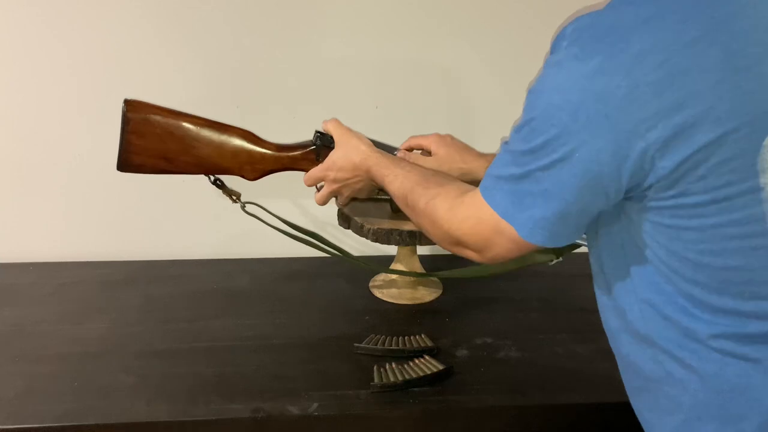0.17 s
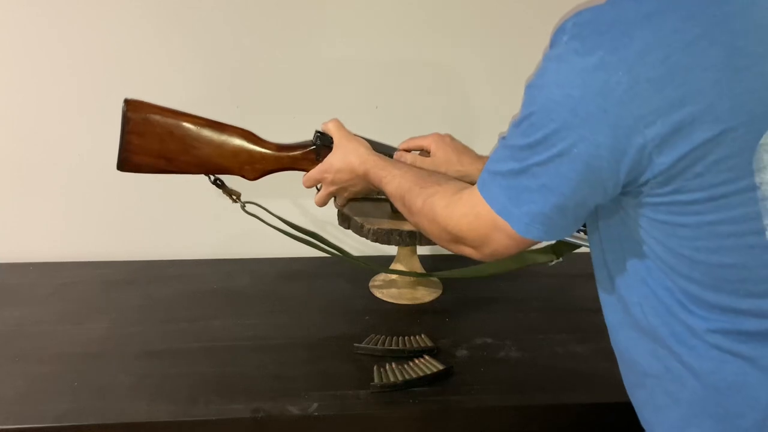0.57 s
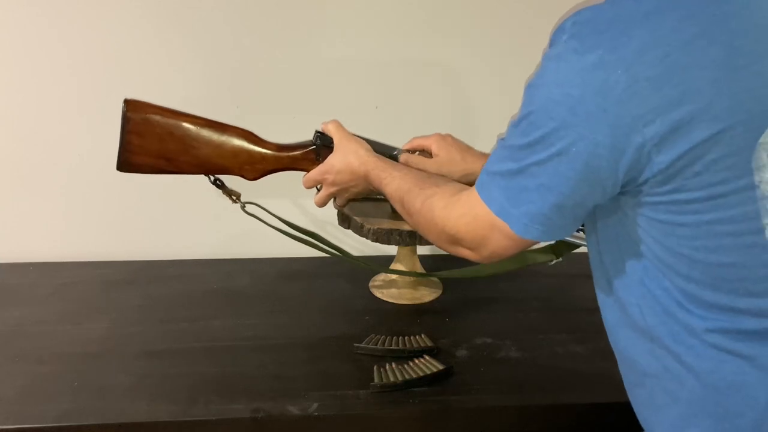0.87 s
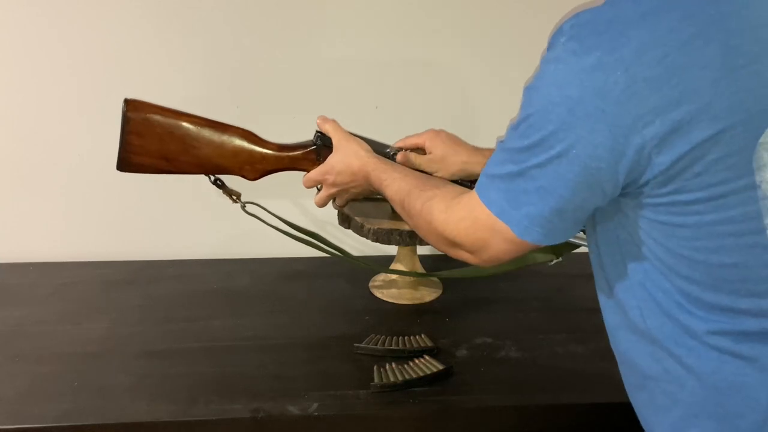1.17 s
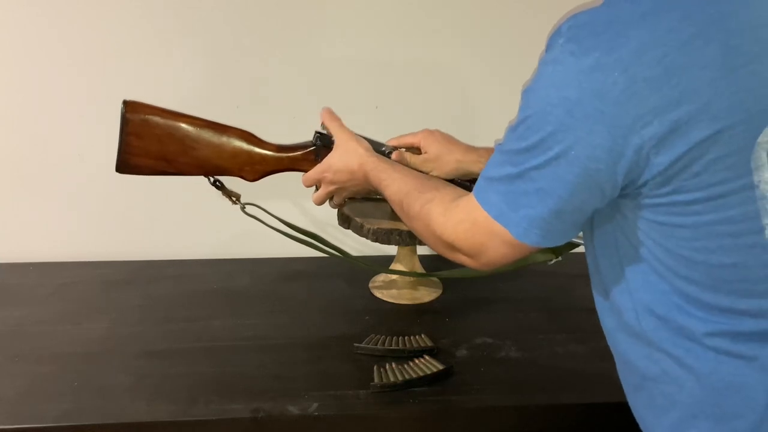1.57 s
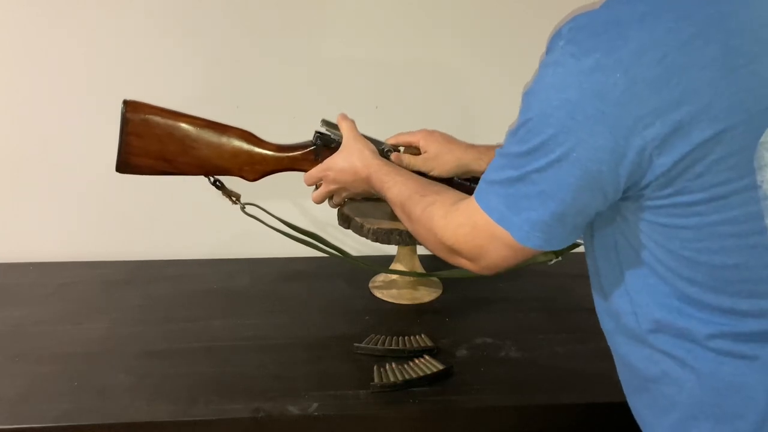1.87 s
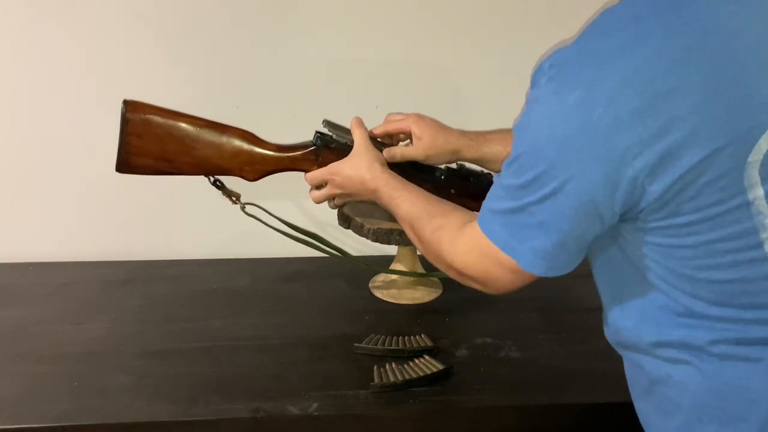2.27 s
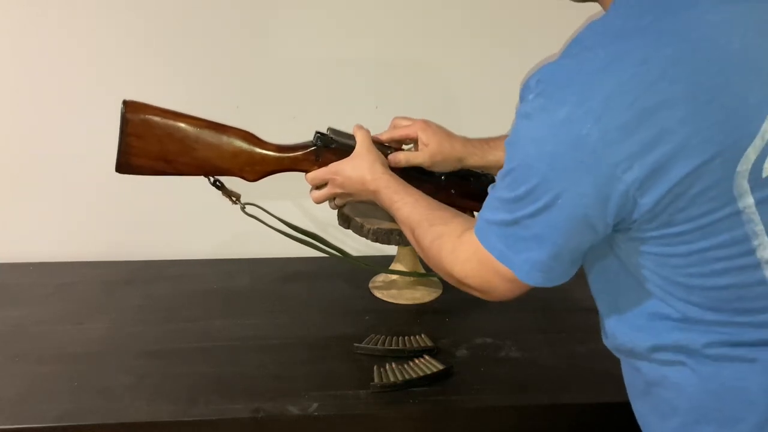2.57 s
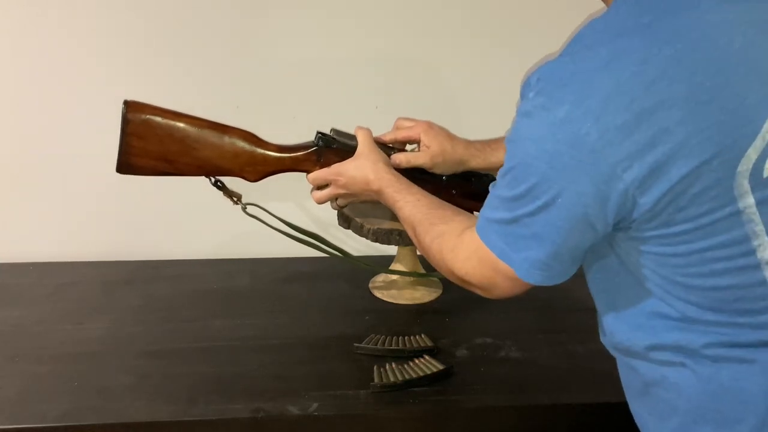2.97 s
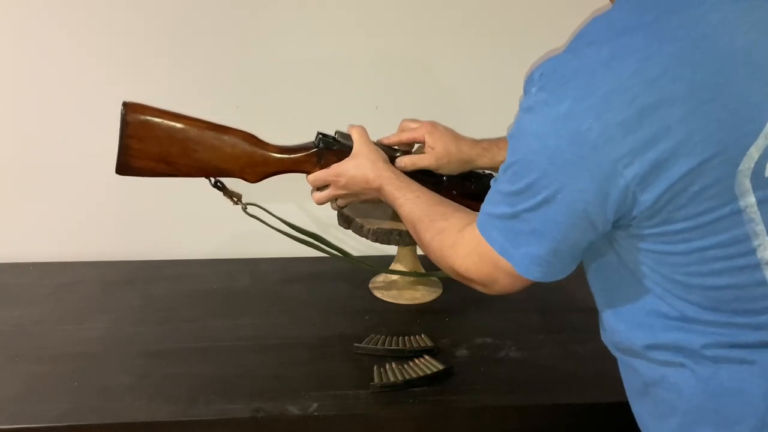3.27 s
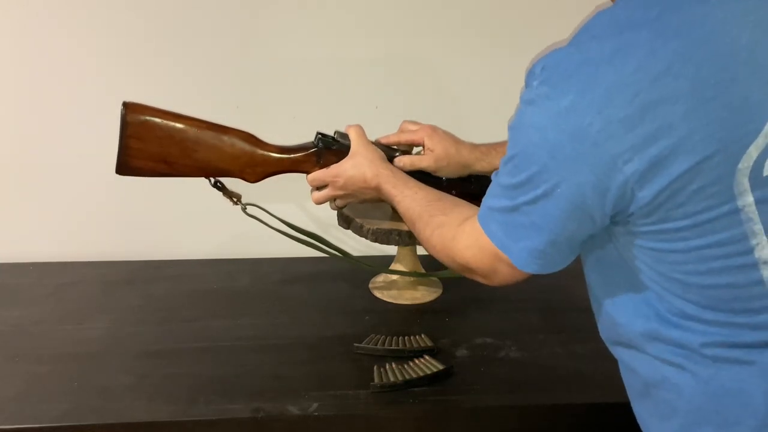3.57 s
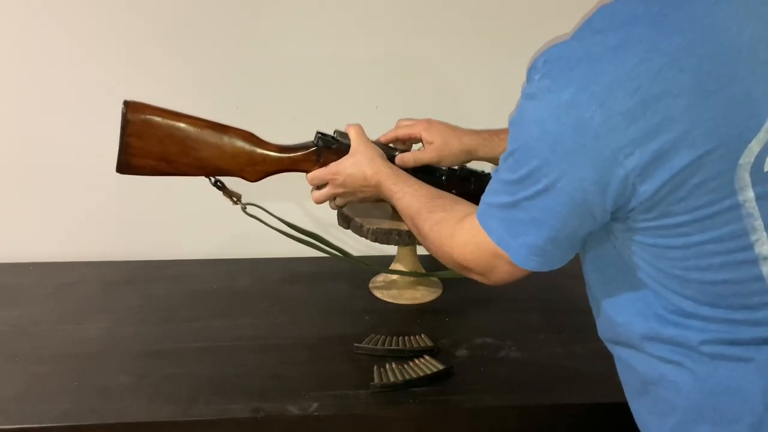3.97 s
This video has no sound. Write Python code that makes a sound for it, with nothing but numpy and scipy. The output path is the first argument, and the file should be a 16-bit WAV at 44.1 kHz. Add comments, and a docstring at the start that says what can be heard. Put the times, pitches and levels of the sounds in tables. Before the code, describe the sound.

Quiet handling, then sharp gritty metal clacks and a quick rattle as a rifle bolt is fitted and slid, over a low room rumble.

```python
"""Hands fit a steel rifle bolt into its receiver on a wooden stand, in a small bare room; 4.1 s, two ports.
0-0.8 s: faint thumps, clicks and scrapes over a low, lumpy rumble that runs throughout.
0.8-1.8 s: contacts crowd and harden, as chattering grit that rings damped steel modes; the loudest is at 1.58 s.
2.2-2.5 s: a quick run of contacts with thumps, which are jolts that ring the stand's modes.
2.7-4.1 s: sparse contacts and scrapes of dense grit; noise tails make the room answer every sound."""
import sys
import numpy as np
from scipy import signal
from scipy.fft import rfft, irfft, next_fast_len
from scipy.io import wavfile
from scipy.ndimage import uniform_filter1d

SR = 44100
rng = np.random.default_rng(int(sys.argv[2]) if len(sys.argv) > 2 else 0)


def to_wav(sig):
    """Store sig (one row per channel, or 1-D mono) as 16-bit WAV at the path in sys.argv[1].

    Samples outside -1..1 are clipped; the rate is SR.
    """
    pcm = np.clip(np.atleast_2d(sig), -1, 1) * 32767
    pcm = np.round(pcm).astype(np.int16)
    wavfile.write(sys.argv[1], SR, pcm.T)  # frames by channels


N = 181251  # samples


def gain_of(db):
    """Amplitude factor of a level in dB."""
    return 10 ** (np.asarray(db) / 20)


def evened(x):
    """Scales to an rms of 1."""
    return x / np.sqrt(np.mean(x ** 2) + 1e-20)


def read(points, hz):
    """Interpolates (Hz, value) points over log frequency."""
    point_hz, value = np.transpose(points)
    return np.interp(np.log(hz + 1), np.log(point_hz + 1), value)


def add(mix, start_s, sound):
    """Adds a sound into the mix, cut at the end."""
    part = mix[round(start_s * SR):][:len(sound)]
    part += sound[:len(part)]


def colour(x, points):
    """Filters by a (Hz, dB) outline with causal, minimum phase."""
    hz = abs(np.fft.fftfreq(4096, 1 / SR))
    log_gain = np.log(gain_of(read(points, hz)))
    spectrum = np.exp(np.conj(signal.hilbert(log_gain)))
    taps = np.fft.ifft(spectrum).real[:1024]
    return signal.oaconvolve(x, taps)[:len(x)]


# Contacts of steel. Each row: start in seconds, peak of the 700-2500 Hz band in dB, trims in dB of the
# lows (near 500 Hz), mids (3 kHz), highs (6.5 kHz) and top (12 kHz), ring over bare impacts in dB,
# favoured ring pitch in Hz.
KNOCKS = [(0.274, -56.5, -6.5, -8, -30, -20, 0, 1170), (0.298, -48, -12, -12, -47, -34, -6, 940),
          (0.789, -44, -11.5, 6.5, 11, -0.5, -4.5, 4170), (0.941, -50.5, -10, -1, -9, -57, 16, 866),
          (1.002, -31.5, -17, 2.5, -1.5, -20, 0, 3080), (1.133, -30.5, -21.5, -11.5, -25, -40.5, -8, 2990),
          (1.262, -27.5, -16, -14.5, -37, -46, -16, 2000), (1.448, -53, -16, -20, -26, -36.5, 8, 972),
          (1.508, -31.5, -5, 22.5, 11, -5, -11, 1910), (1.513, -27, -36, -6.5, -7, -23, -5.5, 2990),
          (1.548, -22.5, -14.5, -5.5, -20, -26.5, -13.5, 1040), (1.571, -29.5, -26, -22, -7, -34, 0, 1046),
          (1.581, -18, -52.5, 5, -5.5, -5.5, 0.5, 1320), (1.634, -20.5, -18, -4, -19, -27.5, -9, 2210),
          (1.803, -27.5, -14, -8, -26, -37, -12, 1194), (2.188, -22, -26, -10.5, -24.5, -30, -9, 1390),
          (2.199, -24.5, -23, -12.5, -24, -30, 3, 2030), (2.211, -30.5, -9.5, -1.5, -7, -23.5, -2.5, 2990),
          (2.225, -29, -21.5, -13, -26.5, -29, -10, 1390), (2.258, -28, -21, -15, -24.5, -40, -20, 2040),
          (2.378, -35.5, -19.5, -7.5, -24.5, -32.5, -8, 2990), (2.423, -40, -6.5, -10, -16, -23, 5.5, 1937),
          (2.448, -41.5, -20.5, 0.5, -5.5, -3.5, 0, 1210), (2.736, -67.5, -6.5, -17, -22.5, -7.5, 5.5, 964),
          (2.884, -67.5, -9.5, -3, 0.5, 5, -7.5, 1307), (2.98, -35, 0.5, 7, -0.5, -3.5, -5.5, 5260),
          (2.985, -29.5, -11.5, -29.5, -21, -32, -6, 1240), (3.299, -61.5, -9, -27, -29.5, -25.5, 5.5, 987),
          (3.811, -38.5, -20, -13.5, -48, -39, -7.5, 1050)]
CHATTER_S, BUILD_S = .0075, .003  # span of a -30 dB contact, linear onset
LONGER_PER_DB = 0.0362  # share by which the span grows per dB over -30


def knock(start_s, peak_db, low_db, mid_db, high_db, top_db, ring_db, favour_hz):
    """Milliseconds of steel chatter that build quickly and stop as the parts seat; harder lasts longer."""
    t = np.arange(7000) / SR
    chatter_s = CHATTER_S * max(1 + LONGER_PER_DB * (peak_db + 30), .4)
    seating = np.exp(-(t / chatter_s) ** 4)
    rattle = .2 * np.exp(-t / 0.033)  # loose parts rattle on faintly
    span = (seating + rattle) * np.minimum(t / BUILD_S, 1)
    outline = [(200, low_db - 14.0), (450, low_db + 10.0), (720, low_db), (920, -1.5),
               (1400, 0.0022), (2200, .15 * mid_db), (3000, mid_db), (4500, mid_db - 3.5),
               (6500, high_db + 3.5), (8500, top_db + 3), (11500, top_db + 6), (16000, top_db - 16.5)]
    sound = colour(steel(chatter_of(span), ring_db, favour_hz), outline)
    level_band = signal.butter(2, [700, 2500], "band", fs=SR, output="sos")
    body = signal.sosfilt(level_band, sound)
    return start_s, gain_of(peak_db) * sound / abs(body).max()


def chatter_of(span):
    """Many small impacts inside the span partly even out, so that no chance pitch stands far out."""
    spectrum = rfft(grit(len(span), 14000, 2.2) * span)
    drive = irfft(spectrum / np.sqrt(abs(spectrum) + 1e-9), len(span))  # halves its dB range
    local_power = uniform_filter1d(drive ** 2, size=90).clip(1e-12)
    return drive * span / np.sqrt(local_power)


def grit(size, per_s, spread_db):
    """Tiny impacts at random times, of uneven strength and random sign."""
    hit_draw, sign_draw, strength_draw = rng.random((size, 3)).T
    hits = hit_draw < per_s / SR
    strength = gain_of(-spread_db * np.log(strength_draw + 0.003))
    return hits * np.sign(sign_draw - .5) * strength


# Modes of bolt and receiver, damped by the hands.
# Each row: pitch in Hz, level before the contact point's bias in dB, t60 in seconds.
STEEL = [(850, -4, .035), (970, -2, .045), (1090, -3, .035), (1250, -2, .035), (1380, -3, .035),
         (1710, -4, .03), (1850, -4, .03), (2000, -3, .035), (2400, -6, .025), (2990, -3, .06),
         (3230, -7, .03), (3470, -7, .025), (3780, -5, .03), (3950, -4, .05), (4430, -8, .025),
         (5200, -8, .025), (5620, -8, .025), (6280, -8, .025), (6830, -8, .03), (7300, -9, .025),
         (10500, -8, .025), (11100, -6, .025), (11800, -8, .02)]


def steel(drive, ring_db, favour_hz):
    """Bare impacts plus the modes they ring, most those near the pitch that the contact point favours."""
    t = np.arange(6000) / SR
    hz, mode_db, t60_s = np.transpose(STEEL)[:, :, None]
    reach, detune = rng.standard_normal((len(STEEL), 2)).T[:, :, None]
    near_db = -np.minimum(51.0 * abs(np.log2(hz / favour_hz)), 13.0)  # 51 dB per octave, at most 13 dB
    level_db = mode_db + near_db + 0.5 * reach - 60 * t / t60_s
    modes = gain_of(level_db) * np.sin(2 * np.pi * hz * (1 + 0.009 * detune) * t)
    ring = modes.sum(0)
    ring = ring / np.linalg.norm(ring)
    return drive + gain_of(ring_db) * signal.oaconvolve(drive, ring)[:len(drive)]


# Strokes of sliding parts and hands. Each row: time of reaching top speed in seconds, rise, hold and fall
# in seconds, body level at the top in dB, treble over body in dB, low rub over body in dB, hiss pitch in Hz.
SCRAPES = [(0.166, 0.031, 0.082, 0.078, -76, -12, -10, 1940),
           (0.294, 0.028, 0.028, 0.042, -69, -23, -6.5, 1310),
           (0.535, .03, 0.067, 0.085, -72.5, -0.5, -10, 2630),
           (1.023, 0.014, 0.012, .06, -48.5, -10.5, -14, 1920),
           (1.072, 0.045, 0.053, 0.016, -55, -12.5, -18, 2030),
           (1.159, 0.022, 0.011, 0.13, -56, -30, -33.5, 1840),
           (1.289, 0.032, 0.018, 0.095, -57, -26, -5.5, 2220),
           (1.501, 0.041, 0.0065, .01, -66, -6, -1.5, 3050),
           (1.521, 0.018, 0.017, .02, -43.5, -1, -15, 2070),
           (1.601, 0.014, 0.014, 0.026, -39, -9.5, -18, 2010),
           (2.168, .008, 0.037, .02, -57, -18.5, -14, 1250),
           (2.27, 0.019, 0.026, 0.11, -54, -21, 0.5, 1710),
           (2.389, 0.014, 0.037, 0.049, -56, -14, -10, 1700),
           (2.499, 0.044, 0.032, .1, -70, -13.5, 5.5, 1230),
           (2.752, 0.028, 0.025, 0.029, -82.5, -20.5, 14.5, 908),
           (2.973, 0.099, 0.0067, 0.012, -58, -9.5, -7.5, 1990),
           (3.039, 0.041, 0.044, .12, -66.5, -12, 1.5, 1498),
           (3.311, 0.029, 0.073, 0.11, -88, -30, 19, 903),
           (3.713, 0.039, 0.092, 0.037, -77.5, -22.5, -15, 1805),
           (3.84, 0.022, 0.01, 0.11, -60.5, -25, -6, 1900)]
STROKE_END_DB = -27.5  # start and end of a stroke re its top, before the end taper


def scrape(top_s, rise_s, hold_s, fall_s, top_db, treble_db, rub_db, favour_hz):
    """Dense grit under the moving part rings the steel a little; skin on wood adds a low rub."""
    t = np.arange(-rise_s, hold_s + fall_s, 1 / SR)
    rub = steel(grit(len(t), 3500, 2.1), -12.5, favour_hz)
    body = evened(colour(rub, [(0.1 * favour_hz, -20), (0.51 * favour_hz, -5.5), (favour_hz, 0),
                               (1.5 * favour_hz, -5.5), (3.3 * favour_hz, -30)]))
    high = evened(colour(rub, [(2500, -26.5), (4000, 8.0), (7000, -4.5), (11500, -10.5), (15000, -33)]))
    low = evened(colour(rub, [(150, -17.5), (300, 6.0), (700, -9), (1100, -33.5), (3000, -58.0)]))
    mix = body + gain_of(treble_db) * high + gain_of(rub_db) * low
    away_from_top = np.maximum(-t / rise_s, np.maximum(t - hold_s, 0) / fall_s)
    level = gain_of(top_db + STROKE_END_DB * away_from_top)
    return top_s - rise_s, level * signal.windows.tukey(len(t), .1) * mix


# Pushes on the wooden stand. Each row: start in seconds, peak in dB, favoured pitch in Hz.
THUMPS = [(0.058, -58.5, 251), (0.275, -51.5, 250), (0.319, -52, 182), (0.806, -46.5, 229),
          (1.015, -41, 260), (1.126, -47.5, 250), (1.262, -49, 414), (1.513, -43, 266), (1.586, -44.5, 277),
          (1.64, -35, 252), (1.809, -49, 267), (2.194, -37.5, 267), (2.203, -35.5, 263), (2.22, -36, 294),
          (2.444, -45, 269), (2.515, -45, 264), (2.754, -57.5, 116), (2.986, -44, 398), (2.998, -44, 174),
          (3.028, -49.5, 388), (3.239, -58, 175.4), (3.81, -50.5, 256)]
# Modes of stand and table.
# Each row: pitch in Hz, level before the favoured-pitch bias in dB, t60 in seconds.
STAND = [(118.5, 6.5, 0.21), (186.4, 2.5, 0.082), (235, -2, 0.051), (262.2, -2.5, 0.12), (372.6, 0.5, 0.13),
         (450, 0, 0.028), (495, -9, 0.014)]
SWING_UP_S = .005


def thump(start_s, peak_db, favour_hz):
    """A short train of jolts rings the modes of the stand, most those near the favoured pitch."""
    t = np.arange(12000) / SR
    hz, mode_db, t60_s = np.transpose(STAND)[:, :, None]
    near_db = -26.0 * abs(np.log2(hz / favour_hz))  # 26 dB per octave
    swing = 1 - np.exp(-t / SWING_UP_S)  # the heavy stand takes time to swing up
    modes = gain_of(mode_db + near_db - 60 * t / t60_s) * np.sin(2 * np.pi * hz * t)
    jolts = 0.21 * grit(len(t), 120, 1.5) * np.exp(-t / 0.015)
    jolts[0] = 1
    sound = signal.oaconvolve(jolts, modes.sum(0) * swing)[:len(t)]
    return start_s, gain_of(peak_db) * sound / abs(sound).max()


# Decay of the room. Each row: frequency in Hz, t60 in seconds.
ROOM = [(200, 0.77), (600, .36), (1400, 0.39), (3700, 0.38), (7000, 0.36), (12000, 0.21)]
ROOM_DB = -5


def room(x):
    """Noise tails, each band dying at its own speed; three take turns, as the hands keep moving the source."""
    hz, t, z = signal.stft(rng.standard_normal((3, 2, SR // 2)), SR, nperseg=256)
    decay = gain_of(-60 * t / read(ROOM, hz)[:, None])
    tails = signal.istft(z * decay, SR, nperseg=256)[1]
    since_s = np.arange(tails.shape[-1]) / SR
    tails = tails * np.clip((since_s - .003) / 0.004, 0, 1)  # reflections gather after the first wall
    tails = tails / np.linalg.norm(tails, axis=-1, keepdims=True)
    turn = 2 * np.pi * 2.5 * np.arange(N) / SR
    echoes = np.zeros((2, N))
    for k in range(3):
        share = np.sqrt(2 / 3) * np.cos(turn + k * np.pi / 3)
        echoes += signal.fftconvolve((x * share)[None], tails[k], axes=1)[:, :N]
    return echoes


# Outline of the steady room noise. Each row: frequency in Hz, relative density in dB per Hz.
RUMBLE = [(22, -18), (40, -3.5), (80, 0), (115, 3.5), (160, -4), (250, -13.5), (400, -19.5), (630, -22.5),
          (1000, -26.5), (2000, -33.5), (4000, -36.5), (8000, -40.5), (12500, -39.5), (13600, -60.5)]
RUMBLE_DB = -64.5  # rms


def steady_noise():
    """Room noise shaped in short spectra, its level drifting in patches of time and frequency."""
    frames, hz = N // 512 + 5, np.fft.rfftfreq(2048, 1 / SR)
    a, b, c, d, patches = rng.standard_normal((frames, 1025, 5)).T
    patches = evened(uniform_filter1d(uniform_filter1d(patches, 6, 0), 6, 1))
    level_db = read(RUMBLE, hz)[:, None] + 3.3 * patches
    z = np.array([a + 1j * b, c + 1j * d]) * gain_of(level_db)
    noise = signal.istft(z, nperseg=2048, noverlap=1536)[1][:, :N]
    return gain_of(RUMBLE_DB) * evened(noise)


# Slow course of the lowest rumble. Each row: time in seconds, level before lumps and smoothing in dB.
SWELL = [(0.0, -72), (0.22, -59), (0.29, -89), (0.33, -61.5), (1.1, -65), (1.14, -52), (1.34, -68.5),
         (1.42, -55.5), (1.46, -62), (1.73, -56), (1.77, -77.5), (1.85, -59.5), (2.04, -71), (3.16, -57.5),
         (3.69, -65.5), (3.72, -79.5), (3.9, -63), (4.11, -66.5)]
SWELL_HZ, SWELL_WIDTH_HZ = 46.7, 9.4
LUMPS_PER_S, LUMP_DB = 6.0, 5.0  # lowpass corner in Hz and rms of the chance lumps


def swelling_rumble():
    """A low tone of wandering pitch makes a narrow band, which swells slowly and in chance lumps."""
    t = np.arange(N) / SR
    drift = uniform_filter1d(uniform_filter1d(rng.standard_normal(N), size=3000), size=3000)
    wander_hz = evened(drift) * SWELL_WIDTH_HZ / 2
    low = np.sqrt(2) * np.sin(2 * np.pi * np.cumsum(SWELL_HZ + wander_hz) / SR)
    lump_filter = signal.butter(2, LUMPS_PER_S, fs=SR, output="sos")
    lumps = signal.sosfilt(lump_filter, rng.standard_normal(N))
    level_db = np.interp(t, *np.transpose(SWELL)) + LUMP_DB * evened(lumps)
    return uniform_filter1d(gain_of(level_db), size=900) * low


# The housing turns the treble round. Each row: frequency in Hz, phase lead of the left port in radians.
LEAD = [(0, 0), (2200, .8), (3000, 1.6), (4500, .9), (5600, 2.2), (7200, 0), (9100, -3.14), (11600, -6.28),
        (13600, -9.42), (15800, -12.57)]
# Diffuse sound. Each row: frequency in Hz, amplitude share common to both ports.
ALIKE = [(50, .95), (300, .85), (700, .5), (1300, .2), (6000, .2), (7200, .85), (9000, .95), (15000, .9)]
# Balance. Each row: frequency in Hz, left over right in dB.
TILT = [(60, -3), (110, -1.5), (200, 1.5), (380, 1.5), (700, 1.5), (1290, 2), (2380, 2.5), (4400, 1),
        (8120, -0.5), (15000, -0.5)]


def ports(common, apart):
    """Two close ports: the right hears a share of unrelated diffuse sound; phase and balance differ."""
    size = next_fast_len(N + 4096)
    hz = np.fft.rfftfreq(size, 1 / SR)
    alike = np.clip(read(ALIKE, hz), 0, 1)
    direct, left, other = rfft(common, size), rfft(apart[0], size), rfft(apart[1], size)
    right = alike * left + np.sqrt(1 - alike ** 2) * other
    lead = np.interp(hz, *np.transpose(LEAD))
    side = np.exp(.5j * lead) * gain_of(read(TILT, hz) / 2)  # half to each port
    return irfft(np.array([(direct + left) * side, (direct + right) / side]), size)[:, :N]


def scene():
    """Contacts, scrapes and thumps, their echoes and the rumble, heard at two ports."""
    rifle, stand = np.zeros(N), np.zeros(N)
    for row in KNOCKS:
        add(rifle, *knock(*row))
    for row in SCRAPES:
        add(rifle, *scrape(*row))
    for row in THUMPS:
        add(stand, *thump(*row))
    echoes = gain_of(ROOM_DB) * room(rifle + gain_of(-6.0) * stand)  # the dull thumps stir the room less
    return ports(rifle + stand + swelling_rumble(), echoes + steady_noise())


EDGE_HZ = 16300


def record(dry):
    """The small microphones lose the deepest bass; then the band limit."""
    bass_cut = signal.butter(2, 34.0, "high", fs=SR, output="sos")
    heard = signal.sosfilt(bass_cut, dry)
    band_limit = signal.firwin(511, EDGE_HZ, window=("kaiser", 9), fs=SR)
    return signal.oaconvolve(heard, band_limit[None], "same")


dry = scene()
out = record(dry)
to_wav(out)
```